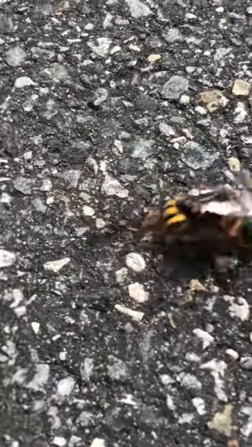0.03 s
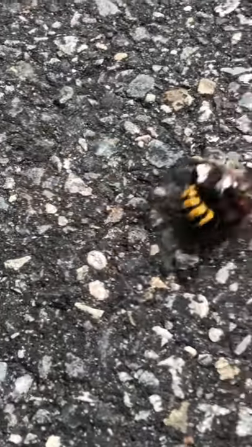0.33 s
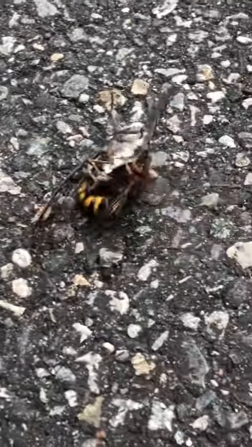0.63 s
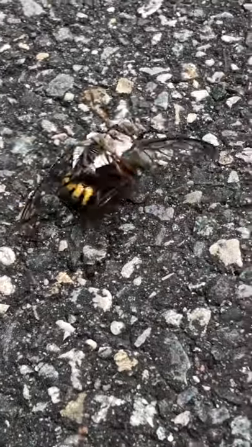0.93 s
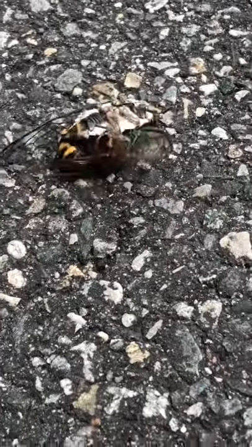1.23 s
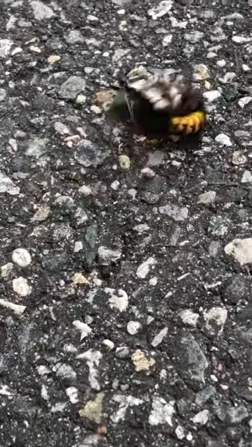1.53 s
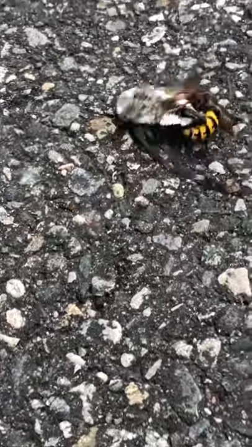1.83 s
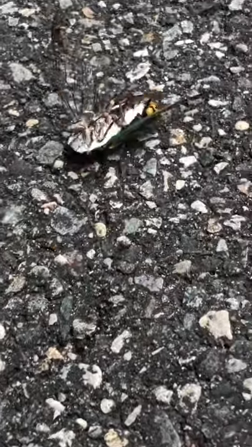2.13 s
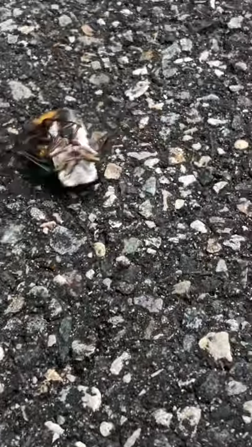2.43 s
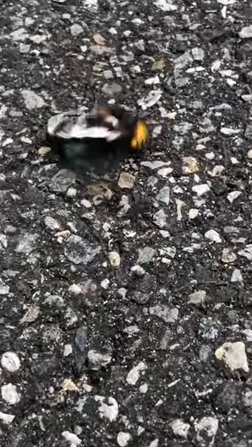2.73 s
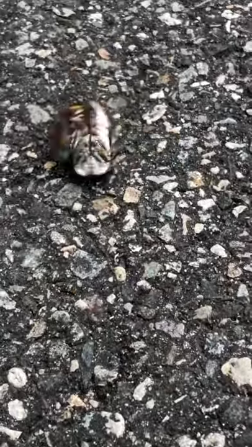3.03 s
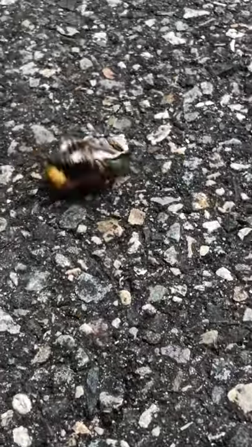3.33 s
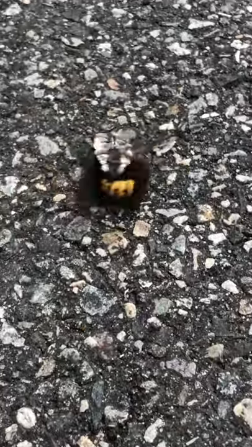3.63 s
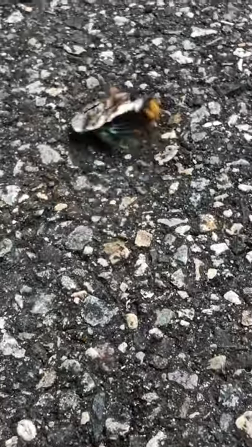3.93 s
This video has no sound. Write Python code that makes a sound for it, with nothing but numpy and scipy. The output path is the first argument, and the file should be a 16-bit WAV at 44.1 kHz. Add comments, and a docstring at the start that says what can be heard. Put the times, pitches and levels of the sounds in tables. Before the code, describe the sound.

Insect wings slapping and rattling dryly on asphalt in short, irregular bursts.

```python
"""Insects grappling on asphalt

Two large insects struggle on the ground, close to the microphone. In short bouts a stiff, dry wing
slaps the asphalt some 35 times a second, scrapes over the grit and rustles between the blows.
Far behind them the tyre wash of a road slowly recedes over a low outdoor rumble and faint hums."""
import sys
import numpy as np
from scipy import signal
from scipy.fft import rfft, irfft, next_fast_len
from scipy.io import wavfile
from scipy.ndimage import map_coordinates

SR = 44100
rng = np.random.default_rng(int(sys.argv[2]) if len(sys.argv) > 2 else 0)


def materialize(psi):
    """Save the field psi as 16-bit PCM at rate SR to the path in sys.argv[1].

    A 1-D psi becomes a single channel; in a 2-D psi each row is a channel.
    """
    bounded = np.clip(np.atleast_2d(psi).T, -1, 1)
    quanta = np.round(bounded * 32767).astype(np.int16)
    wavfile.write(sys.argv[1], SR, quanta)


N = 176400
TOP_HZ = 16100  # upper band limit

# Tyres of a car receding in the distance. Each row: time in seconds, level in dB.
TYRE_LEVELS = [(0, -42.5), (.9, -42), (1.6, -45.5), (2.45, -51.5), (3.3, -53.5), (4, -55)]
# Spectra of the tyre wash and the far traffic rumble. Each row: frequency in Hz, gain in dB.
TYRE_COLOUR = [(300, -5), (500, -11.5), (620, -3.5), (1080, 2.5), (1420, -1.5), (1800, -17), (4000, -24.5),
               (12000, -47)]
TRAFFIC_COLOUR = [(30, -41.5), (46, -10.5), (62, 1), (78, 0), (120, -2), (170, -1), (240, -8), (320, -2.5),
                  (500, -8.5), (620, -4.5), (1000, -11), (1500, -13), (2300, -19.5), (2700, -30.5),
                  (3050, -27), (4500, -34), (7000, -40), (15000, -52.5)]
# A far engine, a faint passing drone and two hums that swell late.
# Each row: time in seconds, pitch in Hz, level in dB.
FAR_ENGINE = [(0, 172, -51.5), (.8, 168.6, -50.5), (1.6, 167, -65), (2.4, 181.5, -60), (3.2, 184.4, -57),
              (4, 166.7, -55)]
PASSING_DRONE = [(1, 377.2, -72), (1.45, 378.2, -49.5), (1.72, 375, -52), (2.3, 352, -53.5),
                 (2.7, 346, -73)]
UPPER_HUM = [(2.9, 286, -81), (3.6, 293, -60), (4, 287.5, -49)]
LOWER_HUM = [(3.1, 215, -69), (3.6, 214.8, -53.5), (4, 223.2, -51.5)]
# Spectra of a wing rubbing on grit and of a wing slap. Each row: frequency in Hz, gain in dB.
RUB_COLOUR = [(300, -20), (1900, -12), (4200, -11), (6500, -5), (11000, -2), (15500, -10)]
SLAP_COLOUR = [(300, -20.5), (1100, -10), (1900, -13), (4200, -6.5), (6300, -3.5), (10400, 0),
               (13800, -5.5), (15500, -9)]
# Resonances that colour every contact. Each row: centre in Hz, width in Hz, boost in dB.
CONTACT_RESONANCES = [(2340, 137, 4), (3330, 260, 5.5), (5240, 117, 2), (9240, 740, 2), (11500, 400, 1.5)]
# Bouts of flapping and faint stirring. Each row: start in seconds, end in seconds, strength in dB.
FLAPPING_BOUTS = [(0, 0.142, -32), (0.266, 0.336, -35), (0.453, 0.508, -40), (0.748, 0.787, -46.5),
                  (0.835, 0.868, -69), (1.012, 1.111, -44.5), (1.272, 1.304, -52.5), (1.362, 1.604, -45),
                  (1.823, 1.85, -55.5), (1.855, 1.949, -35), (2.258, 2.327, -71), (2.335, 2.465, -37),
                  (2.605, 2.783, -37.5), (2.946, 3.044, -35), (3.232, 3.33, -34), (3.537, 3.615, -35.5),
                  (3.805, 3.971, -36)]
# Light wing slaps and small dry ticks. Each row: start in seconds, level in dB.
LIGHT_SLAPS_AND_TICKS = [(0.015, -16), (0.0508, -20), (0.116, -27), (0.2941, -22), (0.4404, -25),
                         (0.551, -43.5), (0.733, -47), (1.177, -48), (1.198, -48), (1.426, -19.5),
                         (1.446, -21.5), (1.457, -23), (1.5105, -29), (1.581, -32), (1.592, -38),
                         (1.9054, -20), (1.984, -31), (2.4129, -21), (2.621, -28), (2.789, -30),
                         (3.254, -22), (3.3256, -22.5), (3.499, -48)]
# Wing scrapes. Each row: middle in seconds, half-length in seconds, level in dB.
WING_SCRAPES = [(0.004, 0.0071, -43), (0.15, 0.005, -35), (0.469, 0.0075, -25), (0.511, 0.0047, -34),
                (0.755, 0.0054, -27.5), (1.039, 0.0087, -30), (1.09, 0.0062, -33.5), (1.109, 0.0053, -34),
                (1.389, 0.0053, -30), (1.481, 0.0083, -19.5), (1.534, 0.0041, -25.5), (1.57, 0.0052, -18.5),
                (1.936, 0.0045, -25.5), (2.371, 0.0064, -28), (2.452, 0.005, -22.5), (2.73, 0.0043, -26),
                (3.07, 0.005, -29.5), (3.316, 0.003, -19), (3.566, 0.013, -27.5), (3.809, 0.0061, -24.5)]
# Wing slaps on the asphalt. Each row: start in seconds, level in dB, low knock in dB,
# top snap in dB, strongest ring in Hz.
WING_SLAPS = [(0.0228, -13, -3, 2, 11100), (0.0555, -13.5, -8, 1, 12300), (0.088, -10.5, 5, 3, 11200),
              (0.123, -10, 1, 0.5, 6800), (0.273, -11, -1, 1.5, 9200), (0.3107, -10, 1, 2.5, 11200),
              (0.3132, -11.5, -14, 4, 10600), (0.447, -12.5, 4.5, -0.5, 10100),
              (0.4826, -12.5, 1, 1, 10300), (0.4858, -14.5, 4.5, 4.5, 8800.0),
              (0.492, -14, -14, -1.5, 10200.0), (1.0118, -14, -0.5, 5, 5670), (1.0622, -18, 4.5, 3.5, 9700),
              (1.0661, -17, 0, -7, 4550), (1.3637, -20, 3, 1, 13100.0), (1.399, -14, 0, -5, 5460),
              (1.403, -12.5, 7.5, 8, 11600), (1.4311, -13, 2, 0, 12400), (1.527, -7, 1, 0, 3760),
              (1.562, -14, 1.5, -1, 5000), (1.854, -16, -2.5, -4, 9600), (1.8944, -11, 4, 12, 12000),
              (1.8992, -12, -6, -5, 11600.0), (2.3358, -16.5, -1, 3.5, 11300), (2.3673, -16, 4.5, 2, 7060),
              (2.3962, -12, 0.5, 0, 9900), (2.4207, -13, 4.5, 4, 9600.0), (2.4492, -13.5, 6.5, 3, 9300),
              (2.601, -15, 6, 4, 6300), (2.6378, -11, -1, -4, 7700), (2.6625, -13, 3, -1, 11900),
              (2.6874, -9.5, 4.5, -6, 7450), (2.7238, -11, 2, -1.5, 5100.0), (2.7585, -14, 6.5, 2, 8700),
              (2.9447, -15.5, 0.5, -0.5, 8600), (2.9831, -12, 4.5, 3.5, 8300), (3.0073, -12, -2, -2, 5800),
              (3.033, -10, 0, 0, 9000), (3.0643, -10.5, 5, 0.5, 9700), (3.2321, -14, -0.5, 0, 6300),
              (3.2675, -10, -5, -8, 7440), (3.288, -10, -5.5, 1, 6750), (3.2914, -16, 2, -7, 5900),
              (3.5306, -16, 5, 4.5, 9300), (3.567, -18, 7.5, 2, 6860), (3.6015, -18.5, 6.5, -1, 6960),
              (3.8044, -14, 3, -2.5, 7200), (3.839, -10, -1, -6, 11360), (3.8619, -9, 1, -5, 7600),
              (3.884, -11, 7, 2, 6100), (3.9087, -11, 5, 0.5, 8050), (3.9324, -16.5, 6, -3, 6500),
              (3.9569, -15, 4, 3, 9000)]


def amp(db):
    """Decibels to gain."""
    return 10 ** (np.asarray(db) / 20)


def unit(x):
    """Scale to rms 1."""
    return x / np.sqrt(np.mean(x ** 2) + 1e-20)


def unit_click(x):
    """Scale a click to the energy of one millisecond at rms 1."""
    return x * np.sqrt(SR / 1000 / np.sum(x ** 2))


def along(points, hz):
    """Read (Hz, dB) points on a log frequency axis."""
    knots_hz, db = np.transpose(points)
    return np.interp(np.log(hz + 1), np.log(knots_hz + 1), db)


def peak(hz, centre, width, db):
    """The bell-shaped boost of one resonance, in dB."""
    return db * np.exp(-((hz - centre) / width) ** 2)


def curves(rows):
    """One value per sample for each column after the time."""
    times, *columns = np.transpose(rows)
    return [np.interp(np.arange(N) / SR, times, column) for column in columns]


def wobble(rate):
    """A smooth random curve, rate knots a second."""
    return map_coordinates(rng.standard_normal(N // 8), [np.arange(N) * rate / SR], mode="wrap")


def coloured(x, gain_db):
    """Pass x through a causal filter whose gain is a function of frequency."""
    size = 2 * next_fast_len(len(x))
    cepstrum = irfft(np.log(amp(gain_db(np.fft.rfftfreq(size, 1 / SR)))), size)
    cepstrum[1:size // 2] *= 2  # fold to minimum phase
    cepstrum[size // 2 + 1:] = 0
    return irfft(rfft(x, size) * np.exp(rfft(cepstrum)), size)[:len(x)]


def noise(colour):
    """Coloured noise of rms 1."""
    return unit(coloured(rng.standard_normal(N), lambda hz: along(colour, hz)))


def add(out, start_s, x):
    """Mix x into out from start_s on."""
    part = out[max(0, round(start_s * SR)):][:len(x)]
    part += x[:len(part)]


def far_hum(rows, drift=0.0178, waver_db=3, octave_db=-20):
    """One unsteady low tone from far away, with a weaker octave."""
    hz, db = curves(rows)
    phase = 2 * np.pi * np.cumsum(hz * (1 + drift * wobble(25))) / SR
    tone = np.sin(phase) + amp(octave_db) * np.sin(2 * phase)
    return amp(db) * unit(tone * amp(waver_db * wobble(9)))


def distant_road():
    """Tyre wash, the rumble of traffic and its faint hums, all far from the microphone."""
    tyre_db, = curves(TYRE_LEVELS)
    tyres = amp(tyre_db + 0.28 * wobble(12)) * noise(TYRE_COLOUR)
    engine = far_hum(FAR_ENGINE, drift=0.0297)
    drone = far_hum(PASSING_DRONE, drift=0.035, octave_db=-6.5)
    late_hums = far_hum(UPPER_HUM) + far_hum(LOWER_HUM)
    rumble = amp(-43) * noise(TRAFFIC_COLOUR)
    return tyres + rumble + engine + drone + late_hums


def reflections(x, level_db=-32, t60_s=0.45):
    """The open surroundings return a thin, diffuse tail: noise that follows the power of x."""
    fade = amp(-60 * np.arange(SR // 3) / SR / t60_s) ** 2
    power = np.abs(signal.fftconvolve(x ** 2, fade / fade.sum())[:N])
    return amp(level_db) * np.sqrt(power) * noise(RUB_COLOUR)


def effort(attack_s=0.0048, release_s=0.0085, trail_db=-24, trail_s=0.044, lift_db=6, lift_s=0.005):
    """Strength of the rubbing: it rises in each bout and dips as the wing lifts before a slap."""
    t = np.arange(N) / SR
    bouts = np.zeros(N)
    for start, end, db in FLAPPING_BOUTS:
        attack = np.exp(np.minimum(0, t - start) / attack_s)
        since_end = np.maximum(0, t - end)
        trail = amp(trail_db) * np.exp(-since_end / trail_s)  # the legs scratch on faintly
        bouts += amp(db) * attack * (np.exp(-since_end / release_s) + trail)
    landings = np.sort([row[0] for row in WING_SLAPS])
    until_slap = np.append(landings, np.inf)[np.searchsorted(landings, t)] - t
    lull = amp(-lift_db * np.exp(-until_slap / lift_s))
    return amp(-75) + bouts * lull  # the insects never lie quite still


def grit(grains_per_s, spread_db=5.5):
    """Tiny contacts of uneven size that ring in the wing, rms 1."""
    hits = (rng.random(N) < grains_per_s / SR) * rng.choice([-1, 1], N)
    sizes = amp(spread_db * rng.standard_normal(N))
    return unit(coloured(hits * sizes, lambda hz: along(RUB_COLOUR, hz)))


def wing_rustle(flutter_db=4.5, flutter_per_s=150):
    """The wings rub unevenly against bodies and ground."""
    flutter = amp(flutter_db * wobble(flutter_per_s))
    return amp(-6) * unit(flutter * grit(grains_per_s=4000))


def wing_taps(count=800, taps_per_s=135, scatter=0.3, decay_s=0.0014):
    """An uneven buzz of light, papery wing taps, each with its own size and colour."""
    out, t = np.zeros(N), np.arange(SR // 128) / SR
    draws = rng.standard_normal((count, 8))
    forces = rng.standard_normal((count, len(t))) * np.exp(-t / decay_s)
    for k, (size, offset, *tint) in enumerate(draws):
        tint_hz = np.linspace(0, TOP_HZ, len(tint))
        tap = coloured(forces[k], lambda hz: along(RUB_COLOUR, hz) + 4.5 * np.interp(hz, tint_hz, tint))
        db = 7 + 2.5 * min(size, 1)
        add(out, (k + scatter * offset) / taps_per_s, amp(db) * unit_click(tap))
    return out


def light_slaps_and_ticks(decay_s=0.0021):
    """Light wing slaps and small dry ticks, in and between the bouts: each a fast-dying noise burst."""
    out, t = np.zeros(N), np.arange(SR // 128) / SR
    for start, db in LIGHT_SLAPS_AND_TICKS:
        force = rng.standard_normal(len(t)) * np.exp(-t / decay_s)
        tick = coloured(force, lambda hz: along(RUB_COLOUR, hz))
        add(out, start, amp(db) * unit_click(tick))
    return out


def wing_scrapes():
    """The wing drags over the grit in short swells."""
    t = np.arange(N) / SR
    swells = sum(amp(db) * np.exp(-2 * ((t - middle) / half) ** 2) for middle, half, db in WING_SCRAPES)
    return amp(-1) * swells * grit(grains_per_s=12000)


def wing_slaps(chatter_s=0.0011, shiver_s=0.004, longest_rebound_s=0.0012):
    """The stiff wing hits the asphalt, rebounds, chatters and shivers; the part that lands rings most."""
    out, t = np.zeros(N), np.arange(SR // 40) / SR
    for start, db, knock_db, snap_db, ring_hz in WING_SLAPS:
        chatter = 0.16 * np.exp(-t / chatter_s)
        shiver = 0.032 * np.exp(-t / shiver_s)
        force = rng.standard_normal(len(t)) * (chatter + shiver)
        force[0] = 1  # the first sharp contact
        rebound = round(longest_rebound_s * SR * rng.uniform(0.2, 1))
        force[rebound] += 0.33 * rng.choice([-1, 1])
        landing = [(1000, knock_db / 2), (4500, knock_db), (7000, 0.0091), (10000, 0), (12000, snap_db)]
        ring = lambda hz: peak(hz, ring_hz, width=790, db=7.5)
        slap = coloured(force, lambda hz: along(SLAP_COLOUR, hz) + along(landing, hz) + ring(hz))
        add(out, start, amp(db) * unit_click(slap))
    return out


def scene():
    """The struggle close to the microphone, the road far behind it, in mono."""
    blows = wing_slaps() + light_slaps_and_ticks()
    contacts = blows + wing_scrapes() + effort() * (wing_rustle() + wing_taps())
    insects = coloured(contacts, lambda hz: sum(peak(hz, *row) for row in CONTACT_RESONANCES) - 1.5)
    return (insects + reflections(insects) + distant_road())[None]


def record(dry):
    """The microphone loses the deepest bass; the recorder keeps nothing above its band limit."""
    size = next_fast_len(N + SR // 2)
    hz = np.fft.rfftfreq(size, 1 / SR)
    low_cut = hz ** 2 / np.sqrt(hz ** 4 + 44 ** 4)  # corner at 44 Hz
    high_cut = np.clip((TOP_HZ - hz) / 1000 + 0.5, 0, 1)
    return irfft(rfft(dry, size) * low_cut * high_cut, size)[..., :N]


dry = scene()
out = record(dry)
materialize(out)
```